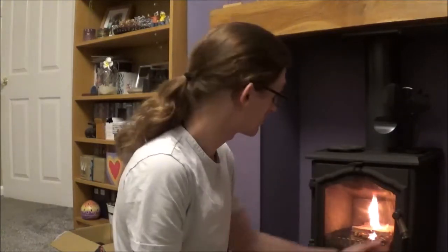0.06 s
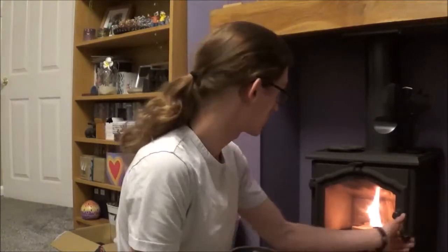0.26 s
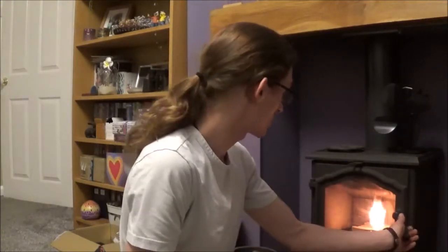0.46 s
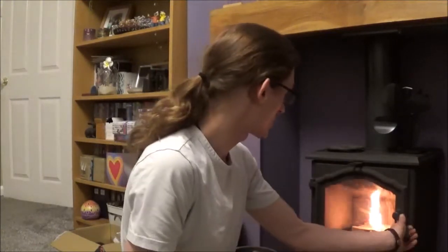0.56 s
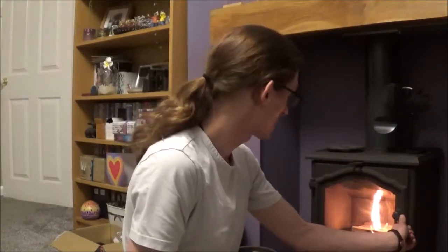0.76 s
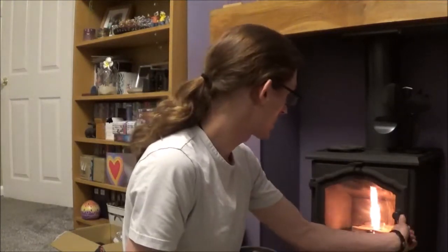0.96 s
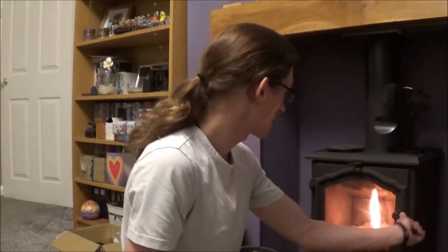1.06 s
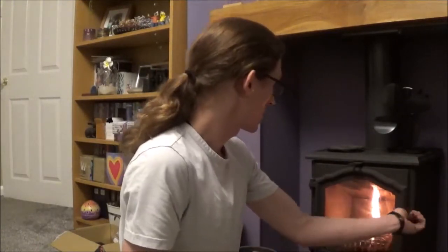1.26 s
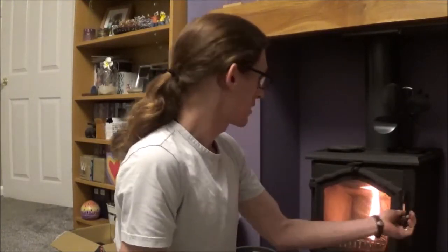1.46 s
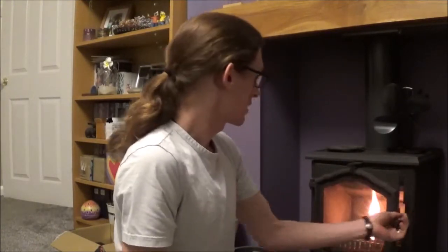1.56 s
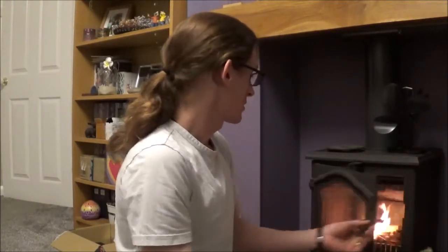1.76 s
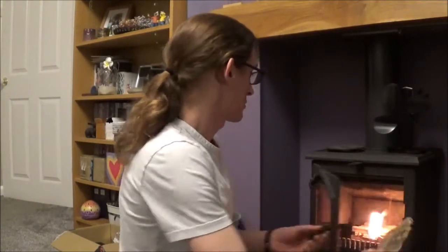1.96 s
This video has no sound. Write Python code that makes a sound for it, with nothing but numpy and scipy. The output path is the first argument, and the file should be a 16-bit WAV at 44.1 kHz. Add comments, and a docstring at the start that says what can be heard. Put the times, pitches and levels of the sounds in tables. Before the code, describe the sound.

A cast-iron stove door unlatches with a sharp metallic clank and squeak, then its hinge whistles

```python
"""A quiet living room in stereo, a cast-iron wood stove a little to the right; faint pips over steady hiss.
First a hand rubs and knocks the handle: coloured grit, noise blows and hollow iron modes; its spindle turns.
At 1 s the latch grinds (tilted noise), squeals near 2.4, 1.5 and 7 kHz (rough harmonics) and ticks clear.
The iron door rings (decaying modes) and a low draught of the fire comes up (coloured grit).
From 1.54 s the door swings in two pulls on a thin hinge whistle (gliding sines), the driest sound here."""
import sys
import numpy as np
from scipy import signal
from scipy.fft import rfft, irfft
from scipy.io import wavfile
from scipy.ndimage import uniform_filter1d

SR = 44100
rng = np.random.default_rng(int(sys.argv[2]) if len(sys.argv) > 2 else 0)


def output_pcm(signal):
    """Save a mono or channel-first signal as 16-bit PCM at the path in sys.argv[1].

    Samples are clipped to [-1, 1] before scaling.
    """
    pcm = np.clip(np.atleast_2d(signal).T, -1, 1) * 32767
    wavfile.write(sys.argv[1], SR, np.round(pcm).astype(np.int16))


N = 88200
T = np.arange(N) / SR  # s

# Every _COLOUR table is a noise spectrum: [f/Hz, relative level/dB per Hz]
# steady hiss of the room
AIR_COLOUR = [(30, -26.5), (233, -3.5), (540, -6.5), (675, -3.5), (930, -8.5), (2620, -6), (3040, -1.5),
              (3990, -8), (11000, -12.5), (14300, -80)]
AIR_DB = -67.5
# low draught of the fire: [t/s, level/dB]
DRAUGHT = [(1.0, -81), (1.2, -61.5), (1.29, -57), (1.4, -66.5), (1.6, -62.5), (1.8, -59.5), (1.92, -57),
           (2.0, -60.5)]
DRAUGHT_COLOUR = [(40, -28), (100, -21), (150, -8), (230, -3.5), (400, -8), (1700, -7), (8400, -11.5),
                  (11000, -16)]
# the hand rubbing on the handle: [t/s, level/dB]
RUB = [(.09, -85), (.13, -61), (.21, -54), (.28, -60.5), (.37, -66), (.44, -69), (.5, -128), (.512, -56),
       (.555, -69.5), (.6, -60.5), (.66, -84)]
RUB_COLOUR = [(150, -14), (500, -1), (1700, -0.5), (3000, -6), (5500, -4), (7500, -4), (8800, 6.5),
              (10500, -7.5)]
# the handle taking up its slack: [t/s, level/dB]
SLACK = [(.12, -81), (.135, -64), (.19, -61), (.225, -55.5), (.275, -68), (.315, -69), (.34, -88)]
# hollow ring of the stove body: [f/Hz, level/dB, t60/s], t60 capped at LONGEST_RING_S
BODY_MODES = [(244, 2, .27), (280, 0, .25), (316, 0, .25), (358, -3, .2), (415, 1, .2), (591, -2, .15),
              (653, -3, .15), (722, -2, .15)]
# soft knocks at the handle and, later, as the door swings:
# [t/s, level/dB before the thud and ring gains, decay/s, centre f/Hz]
KNOCKS = [(.124, -51, 0.071, 1510), (.188, -52.5, 0.038, 690), (0.484, -59.5, 0.037, 1590),
          (.521, -64, 0.055, 745), (1.872, -47.5, 0.024, 860)]
# low thumps, each a single decaying low tone: [t/s, level/dB before rise and decay, f/Hz, decay/s]
THUMPS = [(.13, -60, 415, .05), (1.26, -59, 224, .04), (1.9, -60, 183, .02), (1.9955, -34, 380, .02)]
# sharp ticks of the handle and latch: [t/s, level/dB]
TICKS = [(0.316, -48), (0.485, -47.5), (0.509, -48), (1.015, -22), (1.079, -38), (1.1753, -18.5),
         (1.189, -27)]
TICK_COLOUR = [(60, -51), (400, -26), (1500, -10), (5000, -8.5), (8800, 4.5), (11000, -13)]
# faint high pips in the background: [t/s]
PIPS = [.417, .657, 1.537, 1.577, 1.857, 1.897, 1.937, 1.977]
PIP_HZ, PIP_WIDTH_S, PIP_DB = 3500, .0035, -59.5
# the spindle turning in the door before the latch binds: [t/s, level/dB]
TURN = [(.54, -106.5), (.6, -64), (.67, -63.5), (.745, -56.5), (.83, -61.5), (.91, -63), (.99, -58.5),
        (1.02, -83)]
TURN_COLOUR = [(60, -25.5), (500, -3.5), (1200, -3.5), (2200, -3.5), (4400, 0.5), (6200, -5.5), (8300, -1),
               (11000, -10.5)]
# faint singing of the spindle: [f/Hz, level/dB, t60/s]
SPINDLE_MODES = [(1850, 2, .08), (2180, -1, .04), (2330, -3, .04)]
# latch grinding: [t/s, level/dB before the tilt, treble tilt/dB per octave]
GRIND = [(.982, -73, 19.5), (1.0, -35.5, -3), (1.008, -16.5, 1), (1.015, -17.5, 2.5), (1.026, -22.5, 7),
         (1.05, -31.5, 4), (1.074, -28.5, 6), (1.081, -29.5, 13), (1.11, -34, 9.5), (1.145, -50, 8.5),
         (1.2, -60, 6), (1.3, -62.5, 9.5), (1.4, -70, -4.5)]
GRIND_COLOUR = [(30, -44.5), (90, -21), (200, -7.5), (450, -6), (1100, 0.5), (2400, 4), (3600, -4),
                (5200, -12), (8800, -16.5), (11000, -31.5)]
# ring of the iron door: [f/Hz, level/dB, t60/s], t60 capped at LONGEST_RING_S
DOOR_MODES = [(592, -10.5, .07), (797, -9.5, 0.08), (998, -3.5, 0.084), (1158, 3.5, .18),
              (1344, -10.5, 0.21), (1504, -2, .15), (1674, -2, 0.32), (1766, 11, 0.12), (1969, 0, 0.13),
              (2170, -8, 0.13), (2767, 1, 0.21), (2960, -1.5, 0.165), (3470, -7, .12), (4130, 1.5, .13),
              (6900, -12.5, .2)]
LONGEST_RING_S = .27
# latch squeals: [start t/s, length/s, f/Hz, pitch drift/Hz per s, roughness 0-1,
#                 then level/dB of each harmonic before flutter and pressure]
SQUEALS = [ (1.02, .053, 2402, -500, .12, -19, -25.5, -34, -29),
           (1.077, .035, 1585, -1300, .55, -20, -23, -24.5, -35),
           (1.112, .029, 1520, -500, .6, -30, -29.5, -33, -40), (1.112, .014, 7240, -6000, .15, -22),
           (1.13, .017, 7120, -4500, .15, -23), (1.155, .022, 7040, -800, .1, -28.5)]
SQUEAL_RISE_S, SQUEAL_FALL_S = 0.0017, 0.0056
JITTER_HZ, JITTER_RATE_HZ = 85, 160  # pitch jitter, scaled by the roughness
RASP_RATE_HZ = 200  # width of the rasp round each harmonic
PRESS_DB = 2  # mid-squeal swell, greater for high harmonics and smooth squeals
# hinge whistle: [t/s, f/Hz, level/dB]
HINGE = [(1.54, 5190, -73), (1.585, 5168, -32.5), (1.604, 5175, -19), (1.614, 5175, -21),
         (1.624, 5150, -30.5), (1.631, 5140, -25), (1.64, 5125, -43), (1.652, 5130, -28.5),
         (1.683, 5124, -44), (1.71, 5131, -36.5), (1.75, 5130, -51.5), (1.785, 5125, -56),
         (1.815, 5120, -77), (1.858, 5160, -42.5), (1.89, 5140, -39.5), (1.915, 5175, -26.5),
         (1.942, 5182, -20.5), (1.957, 5188, -28.5), (2.0, 5195, -34.5)]
# octave of the whistle, harder in the second pull: [t/s, level/dB relative to the whistle]
OCTAVE = [(1.61, -28.5), (1.63, -18), (1.7, -31), (1.87, -35), (1.905, -9), (1.94, -26), (1.965, -10),
          (2.0, -30)]
# brief side notes of the hinge: [centre t/s, half width/s, f/Hz, level/dB, waver/Hz]
CHIRPS = [(1.799, .015, 1420, -54, 15), (1.787, .012, 2760, -58, 30), (1.894, .009, 4945, -35, 40),
          (1.9, .02, 5400, -55, 200), (1.565, .04, 8180, -67, 40)]
HINGE_PAN_DB = 1.5  # further to the right than the latch
# reverberation of the living room: [f/Hz, t60/s]
ROOM_T60 = [(100, 1), (500, 0.34), (2000, 0.26), (6000, 0.23), (11000, 0.19)]
RIGHT_DB = 1.0  # right channel over left, for the stove
EDGE_HZ = 11100  # upper band limit


def amp(db):
    """Decibels to gain."""
    return 10 ** (np.asarray(db) / 20)


def unit(x):
    """Scales to an rms of one."""
    return x / np.sqrt(np.mean(x ** 2) + 1e-20)


def read(points, hz):
    """Reads a spectrum table on a log-frequency axis."""
    f, value = np.transpose(points)
    return np.interp(np.log(hz + 1), np.log(f + 1), value)


def level(rows, axis=1):
    """Gain curve from a table of times and dB, at -140 dB outside it."""
    rows = np.array(rows)
    return amp(np.interp(T, rows[:, 0], rows[:, axis], left=-140, right=-140))


def colour(x, points):
    """Minimum-phase filter by a spectrum table, keeping the power of white noise."""
    hz = abs(np.fft.fftfreq(4096, 1 / SR))
    log_gain = np.log(unit(amp(read(points, hz))))
    taps = np.fft.ifft(np.exp(signal.hilbert(log_gain).conj())).real
    return signal.fftconvolve(x, taps[:len(taps) // 2])[:N]


def wander(rate_hz):
    """Smooth random motion of unit rms, fading out above a rate."""
    rolloff = np.exp(-(np.fft.rfftfreq(N, 1 / SR) / rate_hz) ** 2)
    return unit(irfft(rfft(rng.standard_normal(N)) * rolloff, N))


def grit(per_s, spread_db):
    """A random train of tiny slips of uneven size and either sign."""
    size = amp(spread_db * np.minimum(rng.exponential(1, N), 4))
    return unit(size * rng.choice([-1, 1], N) * (rng.random(N) < per_s / SR))


def ring(x, modes):
    """Rings a table of well-damped iron modes, each with its share of the energy."""
    t, response = T[:SR // 2], 0
    for k, (hz, db, t60) in enumerate(modes):
        t60 = min(t60, LONGEST_RING_S)
        decay = amp(db - 60 * t / t60) / np.sqrt(t60)
        response = response + (-1) ** k * decay * np.cos(2 * np.pi * hz * t)
    return signal.fftconvolve(x, response / np.linalg.norm(response))[:N]


def draught():
    """Low draught of the fire: a random train of grit, filtered dark."""
    return level(DRAUGHT) * colour(grit(per_s=4400, spread_db=3.5), DRAUGHT_COLOUR)


def hiss():
    """Steady hiss of the room: stationary coloured noise."""
    return amp(AIR_DB) * unit(colour(rng.standard_normal(N), AIR_COLOUR))


def air(side_db=-11):
    """Hiss and draught, mostly shared by left and right, with a weaker independent side part."""
    mid, side = [hiss() + draught() for _ in range(2)]
    return mid + amp(side_db) * np.array([side, -side])


def rub():
    """Skin drags over the handle in a dense train of uneven slips."""
    return colour(grit(per_s=23000, spread_db=5.5) * level(RUB), RUB_COLOUR)


def creak():
    """The handle takes up its slack in sparse slips that ring the hollow stove body."""
    return ring(grit(per_s=1500, spread_db=2) * level(SLACK), BODY_MODES)


def knock(start, db, decay_s, centre_hz):
    """A dull, grainy blow, an octave wide, that starts at once and dies away."""
    edges = [centre_hz / np.sqrt(2), centre_hz * np.sqrt(2)]
    band = signal.butter(2, edges, "band", fs=SR)
    grain = unit(signal.lfilter(*band, grit(per_s=3000, spread_db=-5.5)))
    return amp(db) * (T >= start) * np.exp(-abs(T - start) / decay_s) * grain


def knocks(ring_db=-13, thud_db=-4):
    """Soft knocks at the handle and, later, as the door swings: thuds that also ring the iron."""
    blows = sum(knock(*row) for row in KNOCKS)
    return amp(thud_db) * blows + amp(ring_db) * ring(blows, DOOR_MODES)


def thump(start, db, hz, decay_s, rise_s=0.0037):
    """One low decaying tone with a soft onset."""
    t = np.maximum(T - start, 0)
    shape = (1 - np.exp(-t / rise_s)) * np.exp(-t / decay_s)
    return np.sqrt(2) * amp(db) * shape * np.sin(2 * np.pi * hz * t)


def burst(start, decay_s):
    """Noise that starts at once and dies away."""
    return (T >= start) * np.exp(-abs(T - start) / decay_s) * rng.standard_normal(N)


def ticks(decay_s=0.0012):
    """Small bright clicks of metal on metal, made of very short noise bursts."""
    clicks = sum(amp(db) * burst(s, decay_s) for s, db in TICKS)
    return colour(clicks, TICK_COLOUR)


def pips():
    """Tiny, brief tones of one pitch under bell-shaped envelopes."""
    envelope = sum(amp(PIP_DB) * np.exp(-((T - s) / PIP_WIDTH_S) ** 2) for s in PIPS)
    return np.sqrt(2) * np.sin(2 * np.pi * PIP_HZ * T) * envelope


def spindle(ring_db=-7):
    """Fine, dry friction of the turning handle, whose sparser catches make it sing faintly."""
    slips = grit(per_s=36000, spread_db=3.0) * level(TURN)
    catches = grit(per_s=400, spread_db=2) * level(TURN)
    return colour(slips, TURN_COLOUR) + amp(ring_db) * ring(catches, SPINDLE_MODES)


def grind(ring_db=-3, rough_db=2, pivot_hz=2800):
    """Iron drags over iron in rough slips of shifting brightness, and rings the door."""
    slips = grit(per_s=9000, spread_db=2) * amp(rough_db * wander(rate_hz=180))
    spectrum = rfft(unit(colour(slips, GRIND_COLOUR)))
    hz = np.fft.rfftfreq(N, 1 / SR)
    tilt = np.interp(T, *np.array(GRIND)[:, [0, 2]].T)
    octaves = np.clip(np.log2((hz + 1) / pivot_hz), -2, 2)
    scrape = 0
    for k in range(-2, 3):  # overlapping bands, each k octaves from the pivot
        band = irfft(spectrum * np.maximum(1 - abs(octaves - k), 0), N)
        scrape = scrape + band * amp(tilt * k)
    door = ring(slips * level(GRIND) * amp(-tilt), DOOR_MODES)
    return scrape * level(GRIND) + amp(ring_db) * door


def squeals(flutter_db=1.0, ring_db=-12):
    """The latch sticks and slips at sagging pitches; chatter smears the harmonics and rings the door."""
    clear, chatter = np.zeros((2, N))
    for start, length, hz, sag, rough, *harmonics_db in SQUEALS:
        t, rough = T - start, np.clip(rough, 0, 1)
        jitter = rough * JITTER_HZ * wander(rate_hz=JITTER_RATE_HZ)
        pitch = hz + sag * np.clip(t, 0, length) + jitter
        turns = np.cumsum(pitch) / SR
        rise = np.clip(t / SQUEAL_RISE_S, 0, 1)
        shape = rise * np.exp(-np.maximum(t - length, 0) / SQUEAL_FALL_S)
        press = np.sin(np.pi * np.clip(t / length, 0, 1)) - np.pi / 4
        for k, db in enumerate(harmonics_db, 1):
            if k * hz < EDGE_HZ:
                rasp = (wander(RASP_RATE_HZ) + 1j * wander(RASP_RATE_HZ)) / np.sqrt(2)
                tone = np.exp(2j * np.pi * (k * turns + rng.random()))
                press_db = PRESS_DB * (k + 1) * (2 - rough) * press
                flutter = flutter_db * wander(rate_hz=52)
                swell = np.sqrt(2) * shape * amp(db + flutter + press_db)
                clear += np.sqrt(1 - rough ** 2) * swell * tone.real
                chatter += rough * swell * (rasp * tone).real
    return clear + chatter + amp(ring_db) * ring(chatter, DOOR_MODES)


def hinge(waver_hz=4, ease_s=0.0029):
    """A nearly pure whistle that swells smoothly, its octave, and brief side notes."""
    pitch = np.interp(T, *np.array(HINGE)[:, :2].T) + waver_hz * wander(rate_hz=82)
    phase = 2 * np.pi * np.cumsum(pitch) / SR
    octave = amp(np.interp(T, *np.transpose(OCTAVE)))
    swell = uniform_filter1d(level(HINGE, axis=2), max(int(ease_s * SR), 1))
    whistle = swell * (np.sin(phase) + octave * np.sin(2 * phase))
    for centre, width, hz, db, waver in CHIRPS:
        turns = np.cumsum(hz + waver * wander(rate_hz=95)) / SR
        shape = 1 / np.cosh(2 * (T - centre) / width) ** .5
        whistle += amp(db) * shape * np.sin(2 * np.pi * turns)
    return np.sqrt(2) * whistle


def room(x, wet_db, side_db):
    """Direct sound a little to the right, with a tail of random echoes that dies faster in the treble."""
    count = SR // 2
    echoes = rng.random((2, count)) < 3000 / SR  # 3000 per second
    taps = rng.choice([-1., 1.], (2, count)) * echoes * (T[:count] > .003)
    hz, t, z = signal.stft(taps, SR, nperseg=256)
    decay = amp(-60 * t / read(ROOM_T60, hz)[:, None])
    tails = signal.istft(z * decay, SR, nperseg=256)[1]
    mid, side = [amp(wet_db) * signal.fftconvolve(x, tail / np.linalg.norm(tail))[:N] for tail in tails]
    side = signal.lfilter(*signal.butter(2, 300, "high", fs=SR), side)  # bass stays central
    stereo = x + mid + amp(side_db) * np.array([side, -side])
    return stereo * amp([[-RIGHT_DB / 2], [RIGHT_DB / 2]])


def scene():
    """Handle with knocks and thumps, latch and hinge, each group with its own room tail, over air and pips."""
    thumps = sum(thump(*row) for row in THUMPS)
    handle = room(rub() + creak() + knocks() + thumps + spindle(), wet_db=-10.5, side_db=1.5)
    latch = room(grind() + ticks(), wet_db=-3.0, side_db=-7)
    squeal = room(squeals(), wet_db=-12, side_db=-4.5)
    swing = room(hinge(), wet_db=-20, side_db=2) * amp([[-HINGE_PAN_DB / 2], [HINGE_PAN_DB / 2]])
    return air() + handle + pips() + latch + squeal + swing


def record(dry, low_cut_hz=70):
    """The microphone thins the deep bass; then a steep low-pass sets the upper band limit."""
    low_cut = signal.butter(2, low_cut_hz, "high", fs=SR, output="sos")
    thin = signal.sosfilt(low_cut, dry)
    low_pass = signal.firwin(401, EDGE_HZ, window=("kaiser", 8), fs=SR)
    return signal.oaconvolve(thin, low_pass[None], "same")


dry = scene()
out = record(dry)
output_pcm(out)
```